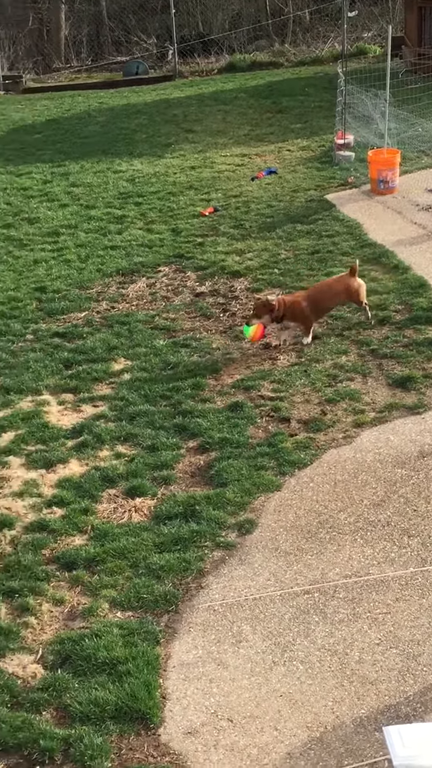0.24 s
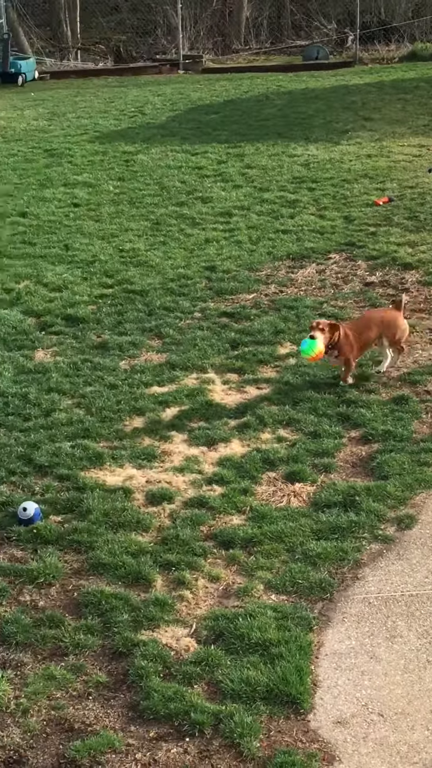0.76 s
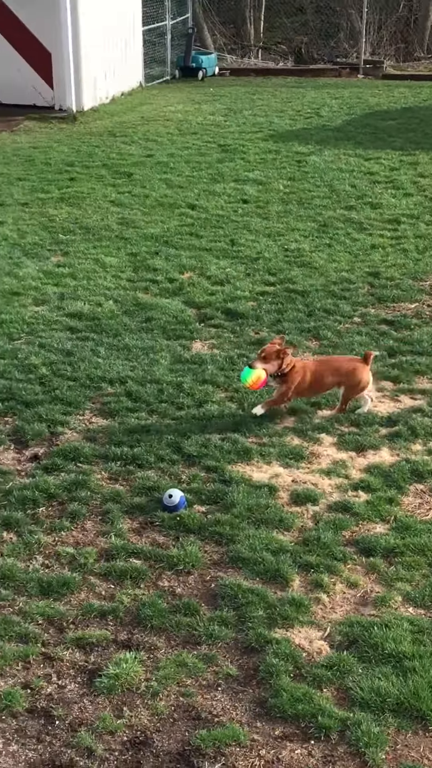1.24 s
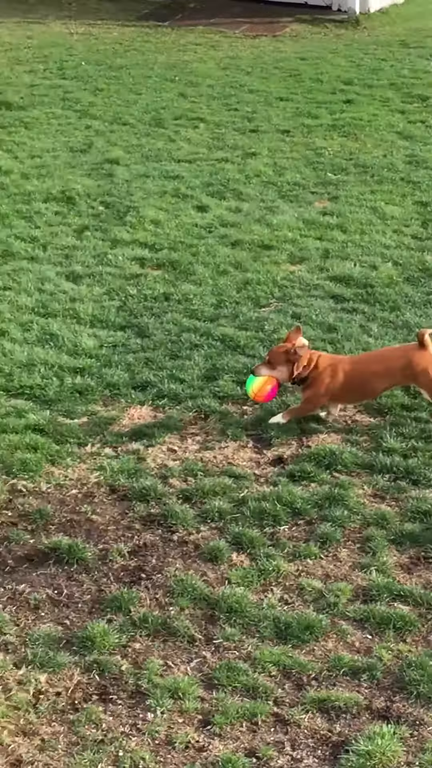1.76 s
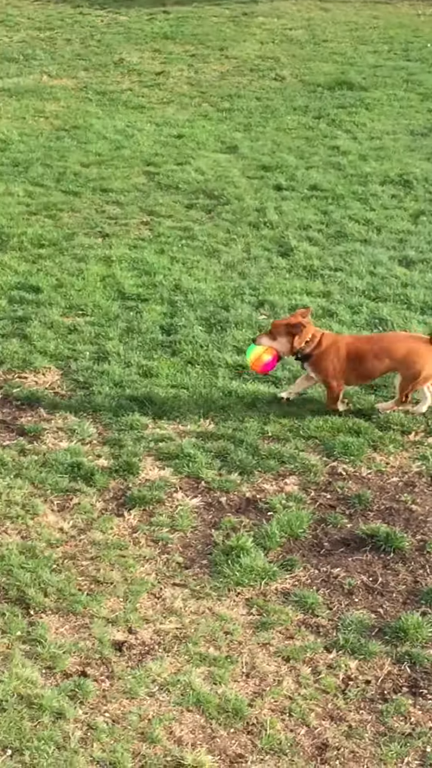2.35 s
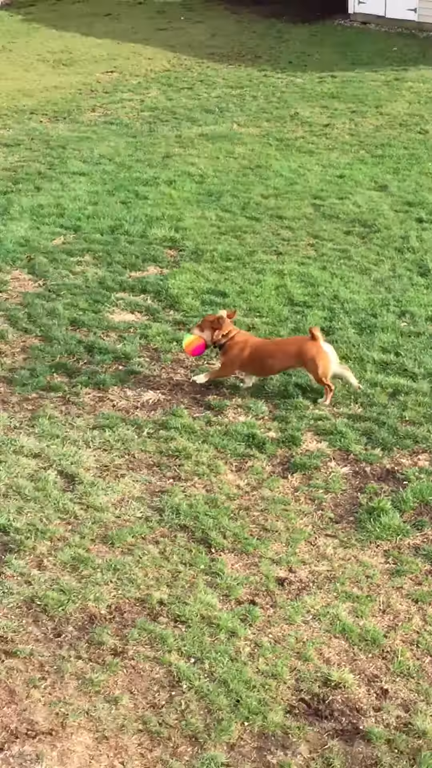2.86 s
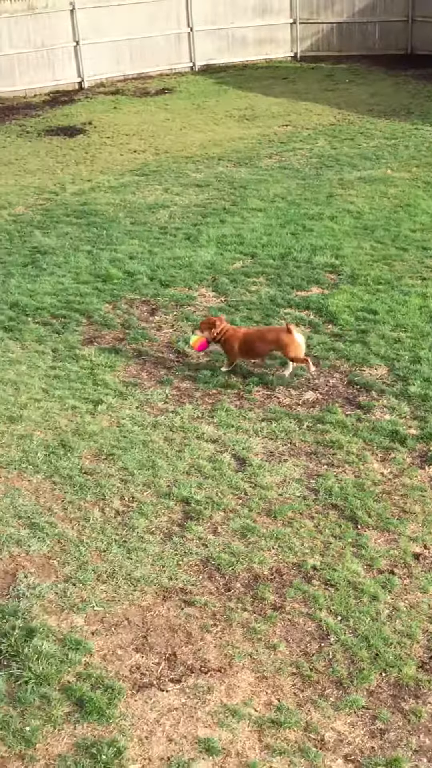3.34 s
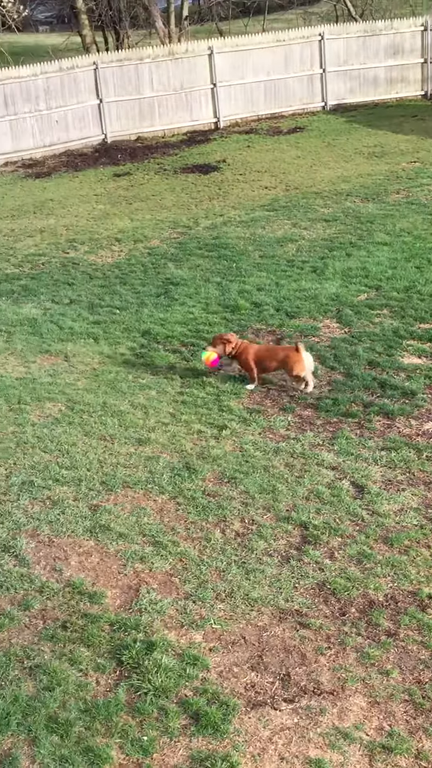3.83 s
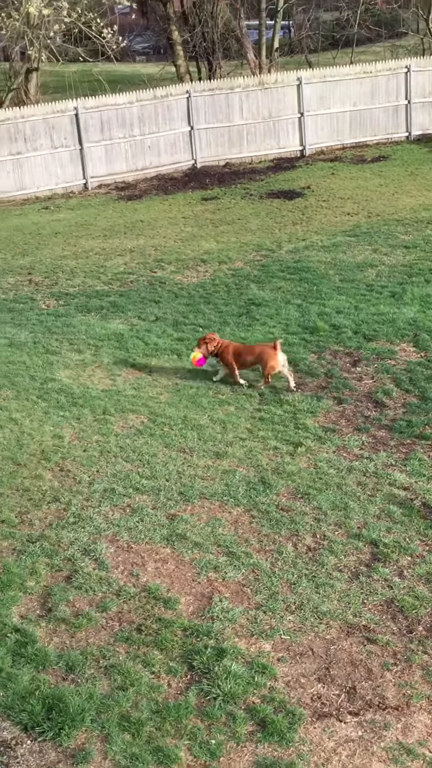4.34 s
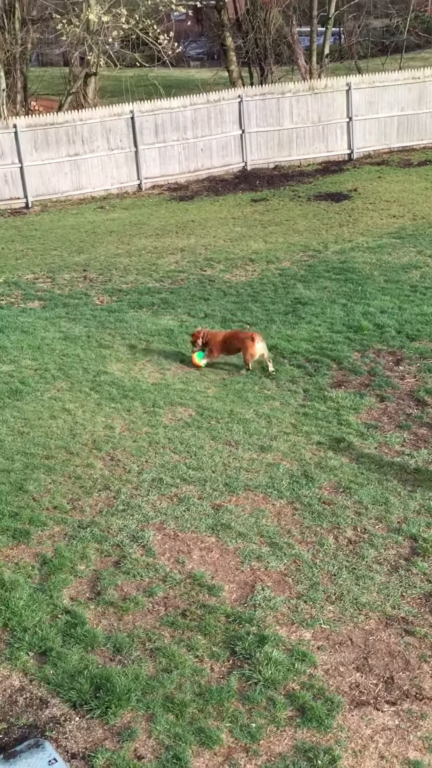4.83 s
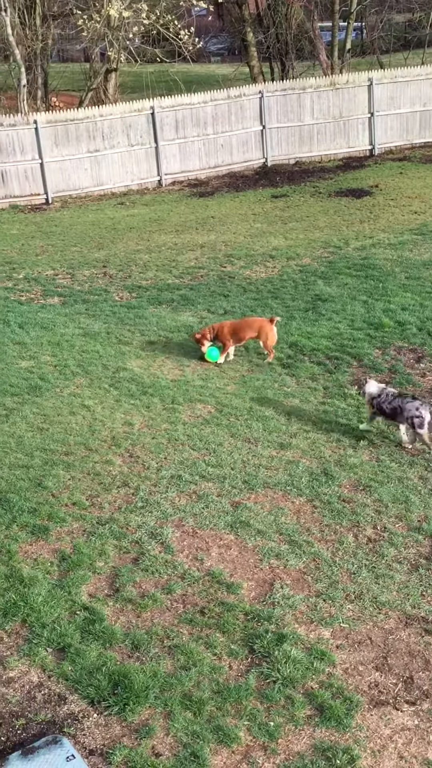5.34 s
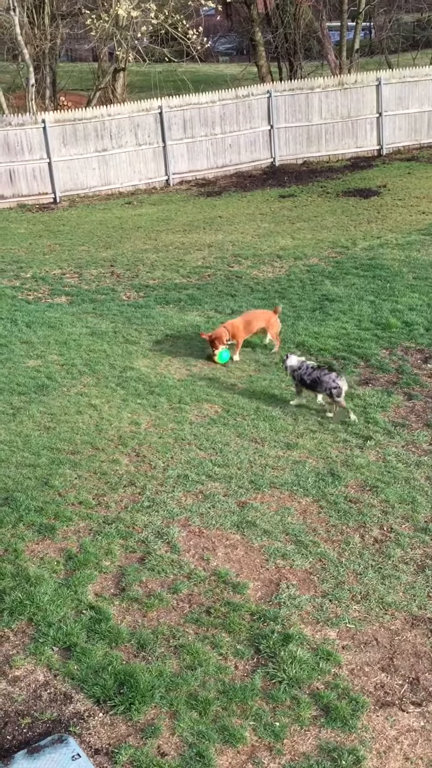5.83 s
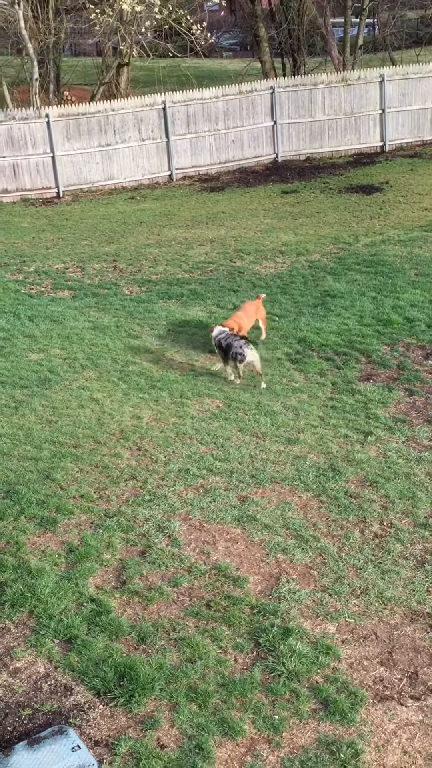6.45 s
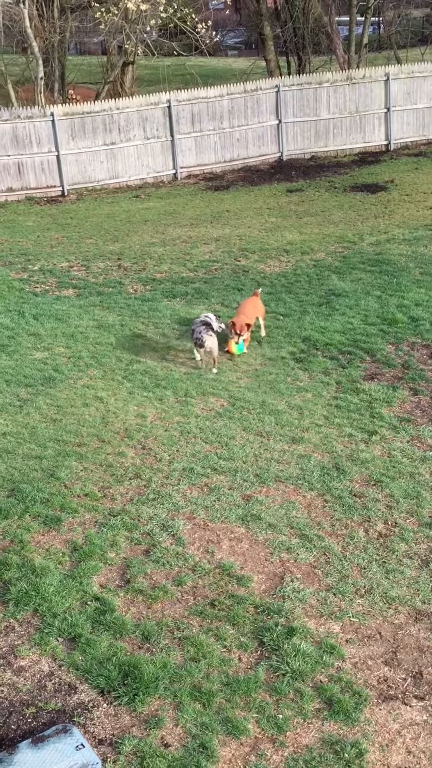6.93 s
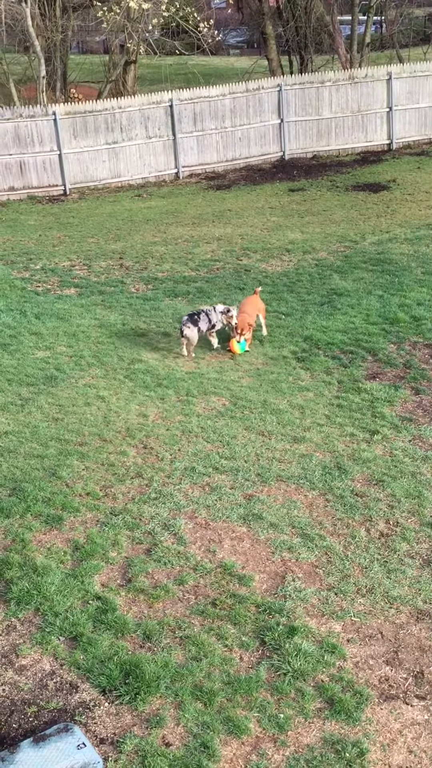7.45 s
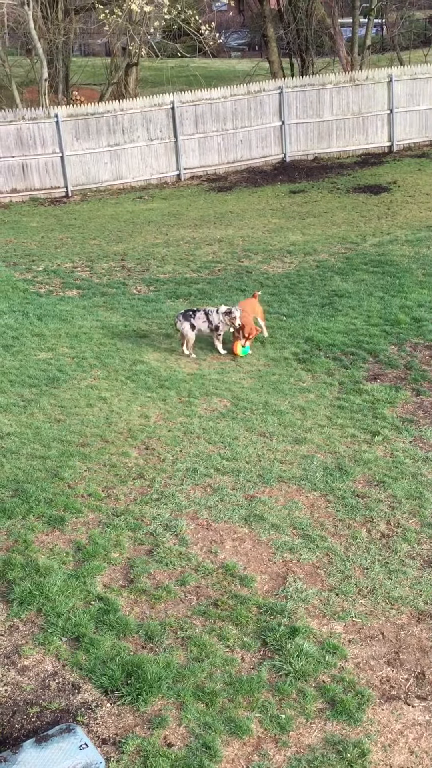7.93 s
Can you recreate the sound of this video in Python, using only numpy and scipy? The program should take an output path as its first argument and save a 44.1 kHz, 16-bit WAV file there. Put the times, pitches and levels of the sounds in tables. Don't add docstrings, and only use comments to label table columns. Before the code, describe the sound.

Small metal collar tags jingle in quick bright clicks as two dogs play with a ball on a lawn, over low outdoor rumble.

```python
import sys
import numpy as np
from scipy import signal
from scipy.io import wavfile
from scipy.ndimage import uniform_filter1d

SR = 44100
rng = np.random.default_rng(int(sys.argv[2]) if len(sys.argv) > 2 else 0)


def volts(x):
    e = np.asarray(x, float) / 20
    return 10 ** e


def transcribe(u):
    v = np.clip(np.atleast_2d(u).T, -1, 1)
    q = np.round(v * 32767).astype(np.int16)
    wavfile.write(sys.argv[1], SR, q)


N = 361179

# pitch_hz, level_db (per Hz)
RUMBLE_COLOUR = [(18, -50), (30, -31), (59, -2.5), (91, -4.5), (119, 0), (132, -3.5), (145, -6),
                 (247, -6.5), (291, -12.5), (364, -16.5), (390, -27.5), (500, -45), (650, -75),
                 (1100, -120)]
# pitch_hz, level_db (per Hz)
AIR_COLOUR = [(220, -5.5), (380, -5.5), (411, -10), (480, -9), (923, -10.5), (4520, -25.5), (4880, -25.5),
              (7210, -25), (7910, -30.5), (9390, -26), (10300, -34.5), (11300, -28.5), (15700, -33)]
# time_s, level_db
WIND = [(0, -60.5), (0.45, -51), (0.57, -48), (0.66, -50), (0.75, -44), (0.95, -53), (1.3, -47.5),
        (1.7, -56), (2.15, -43), (2.65, -57.5), (3.0, -47), (3.15, -58.5), (6.4, -53.5), (7.05, -43),
        (7.6, -46), (7.8, -55.5), (8.19, -54)]
# pitch_hz, level_db
HUM_TONES = [(120, -48.5), (240, -61), (360, -66)]
# start_s, length_s, pitch_hz, level_db
WIND_POPS = [
    (.475, .03, 111, -39),
    (0.543, 0.037, 81, -30.5),
    (0.714, 0.027, 100, -36.5),
    (0.736, 0.039, 101, -29),
]
# start_s, level_db, pitch_factor
SONG_SYLLABLES = [
    (4.477, -60.5, 0.9),
    (4.561, -61.5, 1.035),
    (4.645, -62, 1.01),
    (4.735, -61, 1.04),
    (4.823, -58, 1.01),
    (4.922, -59, 1.),
    (5.02, -63.5, 0.99),
    (5.143, -63, 1.01),
]
# delay_s, length_s, start_pitch_hz, end_pitch_hz, level_db
SYLLABLE_NOTES = [
    (0., 0.032, 2675, 2653, 3),
    (0.016, 0.039, 3210, 3130, 5.5),
    (0.03, 0.017, 4220, 4340, -4),
    (.05, .014, 4010, 4270, -2),
]
# start_s, length_s, start_pitch_hz, end_pitch_hz, level_db
FAR_WHISTLES = [
    (3.331, 0.043, 6300, 4870, -71.5),
    (4.38, 0.033, 5800, 5000, -64),
    (4.956, 0.12, 2390, 2640, -62.5),
    (5.219, 0.046, 2320, 2320, -64),
    (5.364, 0.17, 2390, 2546, -67),
    (7.458, 0.28, 2250, 2570, -71.5),
    (7.96, 0.23, 2200, 2580, -72),
]
# time_s, level_db, pitch_hz
WHINE_PATH = [
    (4.07, -47, 1610),
    (4.085, -63, 1670),
    (4.1, -54, 1870),
    (4.125, -57.5, 1920),
    (4.2, -65, 1970),
    (4.32, -78, 1990),
    (4.37, -60, 1960),
]
# start_s, length_s, level_db, lower_resonance_hz, upper_resonance_hz
NOSE_PUFFS = [
    (0., 0.086, -71, 2460, 3400),
    (4.024, 0.047, -71, 2100, 1700),
    (4.597, 0.035, -50, 810, 2000),
    (4.639, 0.069, -63, 750, 790),
    (5.603, 0.023, -70, 6000, 6270),
    (7.034, 0.036, -46.5, 1270, 1980),
    (7.038, 0.06, -57, 1500, 3150),
    (0.17, .05, -70, 1200, 2200),
]
# start_s, peak_db, body_hz, fade_s (by 60 dB), brightness_db
KNOCK_EVENTS = [(0.672, -42, 420, 0.05, -20), (0.683, -49, 5800, .01, -9), (1.213, -48, 4000, .03, -8),
                (1.518, -47, 3400, 0.044, -6), (2.398, -45, 3800, 0.016, 1.5), (2.455, -49, 3570, 0.017, 1),
                (2.976, -53, 1360, 0.024, -5), (3.563, -42, 1190, 0.015, 5), (3.631, -44.5, 540, 0.03, 2.5),
                (3.647, -20, 2080, 0.022, -23), (4.964, -34, 764, 0.0073, -19),
                (6.402, -47, 1440, 0.038, -8), (6.7, -49, 3200, 0.039, -18), (7.114, -41, 4300, 0.04, -8),
                (5.443, -51, 500, 0.035, -11), (5.953, -48, 450, .02, -20), (6.262, -52, 720, .02, -15),
                (6.495, -54, 630, .03, -25), (0.897, -55, 2500, .012, -14)]
# pitch_hz, pitch_scatter_hz, level_db
FIRST_MODES = [(3410, 122, -15), (4290, 140, -17), (7090, 170, -5), (9250, 120, -2.5), (9730, 25, -6.5),
               (11100, 63, -6), (11500, 61, -8), (12800, 563, -12.5), (14660, 396, -12), (15300, 660, -16)]
# pitch_hz, pitch_scatter_hz, level_db
SECOND_MODES = [(3656, 120, -9), (4290, 42, -3.5), (4670, 37, -3), (5430, 49, -11.5), (6340, 46, -3.5),
                (7330, 49, 0), (8720, 33, -6.5), (9350, 70, 0.5), (10900, 70, -0.5), (11570, 50, 0),
                (12900, 75, -1.5), (13600, 80, -1), (14900, 80, -8), (15360, 160, -6)]
# from_s, to_s
SECOND_SPANS = [
    (2.41, 2.6),
    (2.85, 3.0),
    (3.09, 3.2),
    (3.34, 3.37),
    (3.68, 3.72),
    (4.28, 7.0),
    (7.03, 8.2),
]
# time_s, level_db
BRUSH_LEVEL = [(0.0, -71), (0.6, -75), (1.09, -60), (1.8, -62), (2.6, -65), (3.31, -62), (3.99, -43.5),
               (4.24, -58), (5.84, -55), (6.04, -65), (7.02, -62.5), (7.14, -67), (7.59, -66), (8.19, -57)]
# start_s, length_s, pitch_hz, level_db
SWINGING_TAGS = [(.732, .03, 7150, -62), (.982, .025, 7090, -54), (1.026, .016, 11000, -56),
                 (1.026, .016, 7250, -60), (.985, .05, 3200, -66), (1.776, .04, 6150, -64.5),
                 (2.424, .06, 12900, -62), (2.918, 0.046, 5470, -57), (2.933, 0.093, 8720, -61),
                 (2.93, .07, 10900, -62), (3.384, .036, 3540, -57), (4.459, 0.17, 10700, -65),
                 (5.225, .03, 4980, -60), (5.825, .016, 3680, -56), (5.92, .1, 10900, -64),
                 (6.35, .06, 7330, -60), (6.47, 0.053, 8720, -62), (6.475, .05, 11570, -58),
                 (6.66, 0.093, 10850, -60), (7.084, .03, 6340, -52), (7.225, .1, 12700, -54),
                 (7.329, 0.057, 6340, -62), (7.33, 0.044, 10850, -60), (7.502, 0.1, 4670, -57.5),
                 (7.505, 0.11, 9420, -58), (7.505, .06, 11570, -57), (7.505, .06, 3700, -66),
                 (7.565, .05, 6340, -60), (7.88, .07, 10850, -58), (8.06, .04, 6340, -62),
                 (7.815, 0.065, 12900, -59), (7.876, 0.066, 4670, -67), (8.128, .05, 12900, -65)]
# start_s, peak_db, high_mode_hz, low_mode_hz, low_modes_db
CARRY = [(0.193, -43.5, 11100, 6660, -31), (0.799, -40, 11900, 6770, -6), (0.873, -37.5, 9730, 6640, -20),
         (0.8858, -31, 9440, 7180, -6), (0.9803, -35, 14130, 7090, -7), (1.1842, -43, 11500, 7800, -7),
         (1.2107, -27.5, 9350, 6160, -13), (1.305, -45, 8250, 7050, -15), (1.516, -36, 9600, 7070, -7),
         (1.8397, -36.5, 8700, 7100, -9), (1.8996, -33, 14000, 7150, -8), (2.2365, -35.5, 11100, 6600, -11),
         (2.2652, -38, 11100, 7900, -13), (2.304, -42.5, 9330, 7100, -6), (2.3202, -34, 11500, 7100, -25),
         (2.912, -43, 11000, 6480, -3), (2.93, -38.5, 12800, 4770, -4), (3.052, -37, 9210, 6890, -19),
         (3.13, -45.5, 9350, 7370, -3), (3.3833, -39, 9260, 6940, -1), (3.408, -34.5, 13100, 6270, -17),
         (3.475, -38.5, 13700, 7110, -33)]
CARRY_LENGTHS = [0.0145, 0.0058, .012, .015, .015, 0.017, .008, .012, .02, .015, 0.0066, 0.016, .005, 0.012,
                 0.014, .018, 0.049, .008, .02, .02, .02, 0.0056]
# start_s, peak_db, high_mode_hz, low_mode_hz, low_modes_db
DROP = [(3.747, -29, 9250, 6850, -40), (3.8398, -40, 9500, 7990, -14), (3.867, -31, 9140, 3500, -8),
        (3.923, -36, 9200, 7250, -21), (3.972, -31.5, 9840, 7600, -21), (4.043, -45, 11800, 7270, -5),
        (4.0704, -33.5, 9600, 7400, -21), (4.1836, -42, 9500, 4050, -25), (4.449, -27, 11000, 7280, -4.5),
        (4.6262, -43.5, 12600, 7330, -28), (4.6515, -42, 12800, 5500, -12), (4.778, -40, 9220, 6500, -12.5),
        (4.836, -39, 12800, 7300, -20), (5.048, -44, 8640, 5400, -15), (5.2323, -34.5, 9260, 4240, -8),
        (5.2862, -41, 11500, 7310, -17), (5.645, -48, 13900, 4250, -10), (5.6743, -45, 11000, 7330, -7),
        (5.7614, -38, 10860, 4260, 2), (5.827, -35.5, 11680, 4650, -8), (5.9, -37, 11600, 4290, -8),
        (6.025, -42.5, 13000, 5000, -13)]
DROP_LENGTHS = [.012, .02, .012, .008, .012, .006, .012, .01, .025, .02, .025, 0.014, 0.034, 0.019, 0.029,
                .04, .03, .02, .025, .035, .02, .03]
# start_s, peak_db, high_mode_hz, low_mode_hz, low_modes_db
MEET = [(6.133, -40, 9200, 4320, -4.5), (6.242, -43, 13200, 7280, -5), (6.3653, -33, 9590, 7300, -14),
        (6.466, -38, 11650, 3500, -22), (6.6136, -41, 11600, 7280, -5), (6.646, -30, 11580, 4670, -10.5),
        (7.007, -39.5, 15300, 8600, -31), (7.0606, -35, 11000, 5430, -11), (7.082, -30.5, 13550, 7300, 2),
        (7.1126, -30, 11600, 7200, -4), (7.223, -35, 11500, 7200, -13.5), (7.2654, -32.5, 11500, 3756, -6),
        (7.309, -41.5, 12800, 7160, 2), (7.504, -42.5, 11500, 6370, -7), (7.568, -41, 10900, 6340, -13),
        (7.685, -44.5, 11460, 4670, -20), (7.807, -44.5, 13000, 4660, -10), (7.881, -43, 10900, 4670, -12),
        (7.974, -45.5, 9450, 4220, -5), (8.017, -35.5, 13600, 7300, -10), (8.06, -43, 15450, 6460, -8.5)]
MEET_LENGTHS = [0.015, .02, 0.018, .015, 0.019, .015, .008, .018, 0.023, 0.0152, .015, 0.017, 0.022, .04,
                .025, .02, .012, 0.0305, .005, 0.022, 0.028]
# start_s, peak_db, high_mode_hz, rattle_s
EARLY_LIGHT = [(0.29, -55, 11200, 0.033), (0.669, -49, 11000, .012), (0.717, -52, 14100, .006),
               (0.735, -55, 9300, 0.019), (0.953, -53, 11000, .015), (1.026, -47, 11000, .016),
               (1.047, -42.5, 11000, 0.0052), (1.142, -56, 9400, 0.0043), (1.157, -43, 11100, 0.013),
               (1.255, -54, 11100, .005), (1.283, -50, 11100, .005), (1.494, -54, 9670, 0.0049),
               (1.543, -47, 14400, 0.0085), (1.563, -50, 9250, 0.007), (1.699, -50, 9350, 0.017),
               (1.804, -46, 9200, 0.022), (1.822, -44, 15300, .012), (1.88, -41, 9350, 0.013),
               (1.917, -37, 9500, .008), (2.189, -53, 11100, .008), (2.2017, -47, 11100, 0.0086),
               (2.39, -49, 9200, 0.0047), (2.424, -50, 12900, 0.026), (2.52, -53, 11000, .02),
               (2.549, -55.5, 11600, 0.016), (3.078, -47, 9730, 0.0042), (3.098, -48, 11100, 0.014),
               (3.354, -55, 8720, .015), (3.599, -50, 14100, .005), (3.688, -50, 11000, .03),
               (3.776, -56, 9200, .02), (3.818, -51, 9200, 0.014), (3.941, -41, 9770, .01),
               (3.996, -42, 9400, .006), (4.052, -42, 11700, 0.017), (4.142, -46, 9500, 0.013),
               (4.21, -52, 12700, .02), (4.255, -53, 9330, .006), (4.288, -50.5, 11500, 0.021)]
# start_s, peak_db, high_mode_hz, rattle_s
LATE_LIGHT = [(4.351, -53, 13000, .03), (4.5305, -44, 10800, .02), (4.612, -49, 12800, .012),
              (4.899, -48.5, 11600, 0.0093), (4.995, -53, 12900, 0.018), (5.024, -50, 11600, 0.0092),
              (5.113, -59, 11400, 0.022), (5.177, -51, 11000, 0.017), (5.205, -46, 9220, .02),
              (5.443, -50, 13100, 0.013), (5.488, -44.5, 10900, 0.023), (5.567, -55, 11600, 0.017),
              (5.609, -50, 13000, 0.027), (5.72, -45, 10900, 0.036), (6.233, -53, 9350, 0.0068),
              (6.35, -47, 11000, .014), (6.594, -56, 9500, 0.013), (6.765, -55, 11500, 0.019),
              (6.904, -56.5, 9250, 0.0114), (6.917, -52, 11500, 0.0081), (7.049, -44, 10900, 0.011),
              (7.67, -51, 9510, .01), (7.718, -43, 15150, .006), (7.853, -50, 11600, 0.022),
              (7.951, -47.5, 11000, .02), (7.99, -46, 11500, .015), (8.034, -42, 12900, 0.013),
              (8.118, -53, 11700, .02)]


def evened(x):
    return x / np.sqrt(np.mean(x ** 2) + 1e-20)


def add(mix, start_s, sound):
    part = mix[round(start_s * SR):][:len(sound)]
    part += sound[:len(part)]


def seconds(length_s):
    return np.arange(round(length_s * SR)) / SR


def curves(rows):
    s, *columns = np.transpose(rows)
    t = np.arange(s[0], s[-1], 1 / SR)
    return s[0], [np.interp(t, s, column) for column in columns]


def resonate(x, hz, width_hz):
    turn = np.exp(2j * np.pi * np.cumsum(hz * np.ones(len(x))) / SR)
    r = np.exp(-np.pi * width_hz / SR)
    return 2 * (turn * signal.lfilter([1 - r], [1, -r], x / turn)).real


def resonate_twice(x, hz, width_hz, second_hz, second_width_hz):
    return resonate(resonate(x, hz, width_hz), second_hz, second_width_hz)


def noise(colour, patchy_db):
    hz = np.fft.rfftfreq(2048, 1 / SR)
    real, imaginary, patches = rng.standard_normal((N // 512 + 5, 1025, 3)).T
    patches = uniform_filter1d(patches, size=16, axis=0)
    patches = evened(uniform_filter1d(patches, size=8, axis=1))
    points_hz, db = np.transpose(colour)
    colour_db = np.interp(np.log(hz + 1), np.log(points_hz), db, left=-90, right=-90)
    spectra = (real + 1j * imaginary) * volts(colour_db[:, None] + patchy_db * patches)
    return evened(signal.istft(spectra, nperseg=2048, noverlap=1536)[1][:N])


def town():
    t = np.arange(N) / SR
    wind_db = np.interp(t, *np.transpose(WIND))
    rumble = noise(RUMBLE_COLOUR, patchy_db=2.0)
    wind = signal.sosfiltfilt(signal.butter(3, 100, fs=SR, output="sos"), rumble)
    swell_db = 0.15 * (wind_db - wind_db.mean())
    sound = volts(-50.5 + swell_db) * evened(rumble - wind) + volts(wind_db) * evened(wind)
    for hz, db in HUM_TONES:
        fuzz = evened(resonate_twice(rng.standard_normal(N), hz, 13.5, hz, 17.0))
        sound += volts(db) * (0.64 * np.sin(2 * np.pi * hz * t) + 0.66 * fuzz)
    return sound + volts(-64.0) * noise(AIR_COLOUR, patchy_db=2.0)


def wind_pops():
    out = np.zeros(N)
    for start_s, length_s, hz, db in WIND_POPS:
        t = seconds(length_s)
        add(out, start_s, volts(db) * np.sin(2 * np.pi * hz * t) * np.hanning(len(t)))
    return out


def bird_note(length_s, hz, end_hz, octave_db, flutter_db, waver_share):
    size = round(length_s * SR)
    wobble, waver = (evened(uniform_filter1d(v, size=120)) for v in rng.standard_normal((2, size)))
    glide = end_hz + (hz - end_hz) * np.linspace(1, 0, size) ** 2
    turns = 2 * np.pi * np.cumsum(glide * (1 + waver_share * waver)) / SR
    voice = np.sin(turns) + volts(octave_db) * np.sin(2 * turns)
    return voice * volts(flutter_db * wobble) * signal.windows.tukey(size, .6)


def birds():
    out = np.zeros(N)
    for start_s, db, pitch in SONG_SYLLABLES:
        for delay_s, length_s, hz, end_hz, note_db in SYLLABLE_NOTES:
            octave_db = -23 if delay_s else -9.5
            tilt_db = -90. * (1 - pitch) * (hz > 4000)
            sound = bird_note(length_s, pitch * hz, pitch * end_hz, octave_db, flutter_db=2., waver_share=0.012)
            add(out, start_s + delay_s, volts(db + note_db + tilt_db) * sound)
    for start_s, length_s, hz, end_hz, db in FAR_WHISTLES:
        sound = bird_note(length_s, hz, end_hz, -43.0, flutter_db=5.5, waver_share=0.0056)
        add(out, start_s, volts(db) * sound)
    echo = rng.standard_normal(8000) * volts(-60 * np.arange(8000) / SR / 0.7)
    return out + volts(-12.0) * signal.oaconvolve(out, echo / np.linalg.norm(echo))[:N]


def far_bark():
    out = np.zeros(N)
    at_s = np.cumsum([2.155, 0.025, 0.057, 0.079, 0.14, 0.18])
    level_db = -50. + np.array([-27, 0, 0, -16.5, -16.5, -27])
    start_s, (db, hz) = curves(np.transpose([at_s, level_db, np.linspace(1230, 1300, len(at_s))]))
    breath = rng.standard_normal(len(hz))
    throat = evened(resonate_twice(breath, hz, 130, hz, 200))
    mouth = evened(resonate_twice(breath, 1.28 * hz, 180, 1.26 * hz, 220))
    voice = evened(throat + volts(-10.0) * mouth)
    add(out, start_s, volts(db) * voice * signal.windows.tukey(len(hz), .05))
    return out


def whine():
    out = np.zeros(N)
    start_s, (db, hz) = curves(WHINE_PATH)
    voice = np.zeros(len(hz))
    for k, fold_db in ((1, 0.0), (2, 0.0), (3, -16.5)):
        breath = rng.standard_normal(len(hz))
        voice += volts(fold_db) * evened(resonate_twice(breath, k * hz / 2, 150, k * hz / 2, 190))
    add(out, start_s, volts(db) * voice * signal.windows.tukey(len(hz), .08))
    return out


def snorts():
    out = np.zeros(N)
    for start_s, length_s, db, low_hz, high_hz in NOSE_PUFFS:
        t = seconds(2 * length_s) / length_s
        puff = np.minimum(t / 0.34, 1) * volts(-40. * np.maximum(t - .7, 0))
        air = rng.standard_normal(len(t)) * puff
        low, high = (evened(resonate_twice(air, hz, 0.33 * hz, hz, 0.47 * hz)) for hz in (low_hz, high_hz))
        add(out, start_s, volts(db) * (low + volts(-6.5) * high))
    return out


def knocks():
    out, t = np.zeros(N), np.arange(4500) / SR
    for start_s, peak_db, hz, fade_s, bright_db in KNOCK_EVENTS:
        fade = volts(-60 * t / max(fade_s, .008)) + volts(-13.0 - 60 * t / 0.099)
        burst = rng.standard_normal(len(t)) * fade * np.minimum(t / 0.00032, 1)
        body = resonate_twice(burst, hz, min(800, 0.7 * hz), hz, min(3600, 1.7 * hz))
        crack = resonate_twice(burst, 2370, 2800, 2050, 3100)
        thud = resonate_twice(burst, 710, 450, 820, 560)
        for db, part in ((0, body), (bright_db, crack), (-12., thud)):
            add(out, start_s, volts(peak_db + db) * part / abs(part).max())
    return out


def second_heard(s):
    return np.any([(a < s) & (s < b) for a, b in SECOND_SPANS], axis=0)


def brushing(per_s, spread_db):
    out, t = np.zeros(N), np.arange(N) / SR
    second = second_heard(t)
    for modes, near in ((FIRST_MODES, ~second), (SECOND_MODES, second)):
        for hz, _, db in modes:
            at = rng.integers(0, N, round(per_s * N / SR))
            touches = np.zeros(N)
            touches[at] = near[at] * volts(spread_db * np.minimum(rng.exponential(1, len(at)), 3))
            pole = np.exp((2j * hz - 45.) * np.pi / SR)
            out += volts(db) * signal.lfilter([0, pole.imag], [1, -2 * pole.real, abs(pole) ** 2], touches)
    return evened(out) * volts(np.interp(t, *np.transpose(BRUSH_LEVEL)) - 15.5)


def free_rings():
    out = np.zeros(N)
    for start_s, length_s, hz, db in SWINGING_TAGS:
        t = seconds(length_s)
        tone = np.sin(2 * np.pi * hz * t) + .4 * np.cos(2 * np.pi * hz * 1.004 * t)
        add(out, start_s, volts(db - 8.2 * t / length_s) * tone * signal.windows.tukey(len(t), .15))
    return out


def contact_pushes(level_db, luck, size, length_s, rattle_db):
    when = rng.random(8) * (np.arange(8) > 0)
    later = when > 0
    force = volts(np.where(later, rattle_db - 7 * when, 0))
    turn = np.exp(3j * luck) * np.where(later[:, None], rng.standard_normal((8, len(level_db))), 1)
    pushes = np.zeros((len(level_db), size), complex)
    pushes[:, (when * length_s * SR).astype(int)] = (force[:, None] * turn * volts(level_db)).T
    pushes[:, 1:] = uniform_filter1d(pushes[:, 1:], size=130, axis=1, mode="constant")
    return pushes


def strike(row, gap_s, modes, spread_db, lead_db, rattle_db, tick_db, scrape_db, width_hz, rough, rise_s,
           linger_db):
    _, peak_db, high_hz, low_hz, low_db, rattle_s = row
    hz, spread_hz, db = np.transpose(modes)
    level_luck, fade_luck = rng.standard_normal((2, len(hz)))
    pitch_luck = rng.standard_normal((8, len(hz)))
    tune_luck = level_luck if len(hz) == 0 else rng.standard_normal(len(hz))
    length_s = np.clip(rattle_s, .003, .06)
    t = seconds(min(gap_s, .04) + .025 + 2.2 * length_s)
    level_db = np.minimum(db + spread_db * level_luck, lead_db - 2.5)
    ring_hz = hz + 0.703 * spread_hz * tune_luck
    for lead_hz in (high_hz, low_hz):
        nearest = np.argmin(abs(hz - lead_hz))
        level_db[nearest], ring_hz[nearest] = lead_db, lead_hz
    level_db += (low_db + 3.0) * (hz < 8000)

    pushes = contact_pushes(level_db, pitch_luck, len(t), length_s, rattle_db)
    fades = np.exp(-np.pi * width_hz * np.exp(0.64 * fade_luck) * np.sqrt(0.083 / length_s) / SR)
    swing = np.array([signal.lfilter([1], [1, -r], push) for r, push in zip(fades, pushes)])
    edge = rng.standard_normal(len(t))
    shake = evened(uniform_filter1d(edge, size=40, mode="wrap"))
    chatter = np.array([np.roll(shake, 97 * k) for k in range(len(hz))])
    swing = swing * (1 - rough + rough * chatter)
    after = np.exp(-np.maximum(t - length_s, 0) / (.007 + .35 * length_s))

    escapes = (abs(hz - 11000) < 200)[:, None]
    lingering = escapes * volts(linger_db + level_db[:, None] - 60 * t / 0.52)
    lingering = lingering * np.clip((min(gap_s, t[-1]) - t) / 0.006, 0, 1)
    ring = ((swing * after + lingering) * np.exp(2j * np.pi * ring_hz[:, None] * t)).imag.sum(0)
    motion = abs(swing).mean(0)
    grit = volts(tick_db) * np.exp(-t / 0.001) + volts(scrape_db) * motion / motion.max() * after
    bright = signal.butter(2, 6300, "high", fs=SR, output="sos")
    sound = ring / abs(ring).max() + signal.sosfilt(bright, edge) * grit / 3
    sound = sound * np.minimum(t / (rise_s * np.exp(fade_luck[0] / 2)), 1)
    return volts(peak_db) * sound / abs(sound).max()


def tags(strikes, modes, **metal):
    out = np.zeros(N)
    gaps_s = np.diff(strikes[:, 0], append=N / SR)
    for row, gap_s in zip(strikes, gaps_s):
        add(out, row[0], strike(row, gap_s, modes, **metal))
    return out


def collars():
    firm = zip(CARRY + DROP + MEET, CARRY_LENGTHS + DROP_LENGTHS + MEET_LENGTHS)
    strikes = [(*row, rattle_s) for row, rattle_s in firm]
    for *row, rattle_s in EARLY_LIGHT + LATE_LIGHT:
        strikes.append((*row, 7300, -11.5, rattle_s))
    strikes = np.array(sorted(strikes))
    second = second_heard(strikes[:, 0])
    sound = tags(strikes[~second], FIRST_MODES, spread_db=4.5, lead_db=6.0, rattle_db=-5.0, tick_db=3.0,
                 scrape_db=-3.0, width_hz=77.0, rough=.4, rise_s=0.0024, linger_db=-40.0)
    sound += tags(strikes[second], SECOND_MODES, spread_db=6.0, lead_db=11.0, rattle_db=-7.5, tick_db=-1.0,
                  scrape_db=-11.0, width_hz=28., rough=.15, rise_s=0.0037, linger_db=-30.0)
    sound += free_rings() + brushing(per_s=60., spread_db=5.0)
    t = np.arange(SR // 8) / SR
    lawn = rng.standard_normal(len(t)) * volts(-60 * t / 0.14)
    return sound + volts(-15.5) * signal.oaconvolve(sound, lawn / np.linalg.norm(lawn))[:N]


def scene():
    background = town() + wind_pops() + birds() + far_bark()
    return (background + whine() + snorts() + knocks() + collars())[None]


def band_limit(x):
    return signal.sosfilt(signal.butter(12, 16660, fs=SR, output="sos"), x)


def record(dry):
    edge_hz = [0, 15650, 15900, 16500, 16700, SR / 2]
    edge = signal.firwin2(401, edge_hz, [1, 1, .08, .05, 0, 0], fs=SR)
    mix = signal.oaconvolve(dry, edge[None], "same")
    return band_limit(mix)


dry = scene()
out = record(dry)
transcribe(out)
```